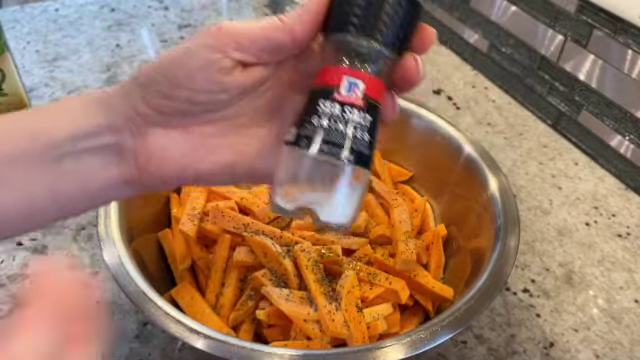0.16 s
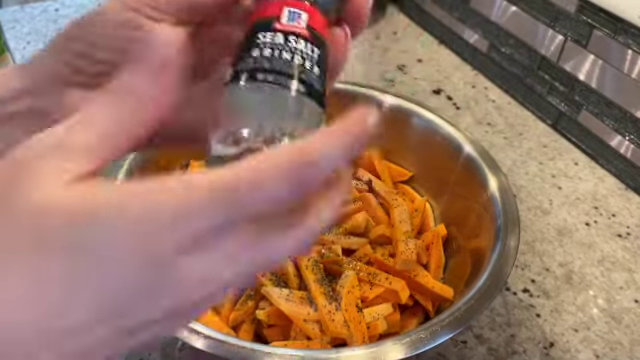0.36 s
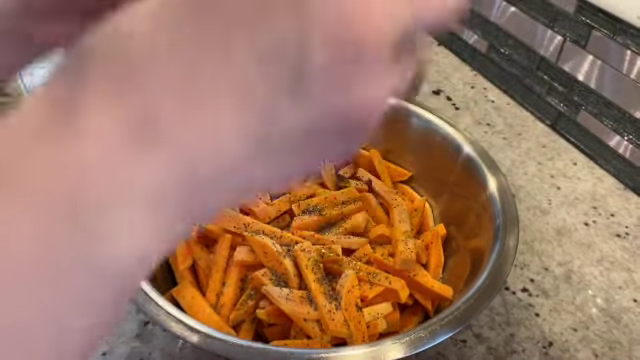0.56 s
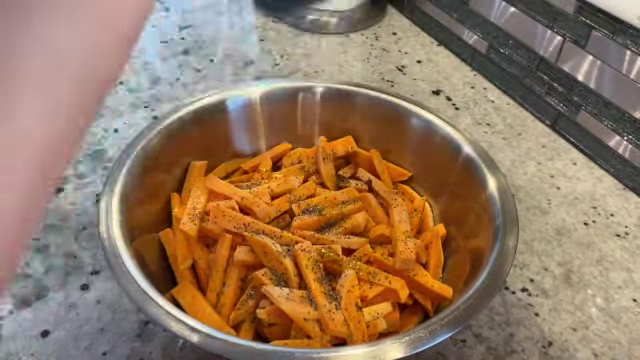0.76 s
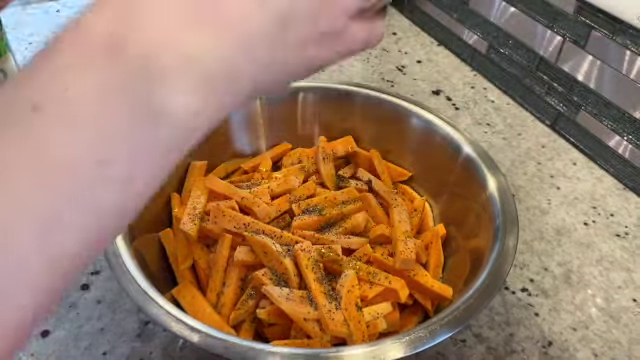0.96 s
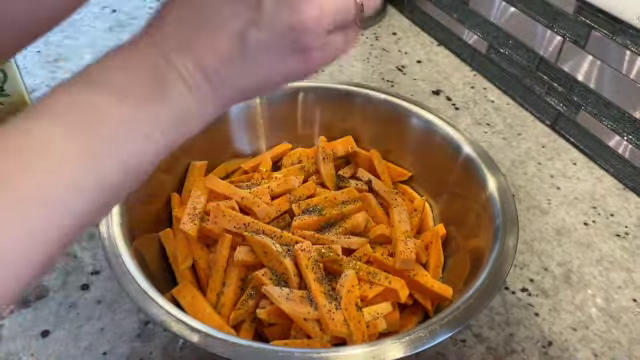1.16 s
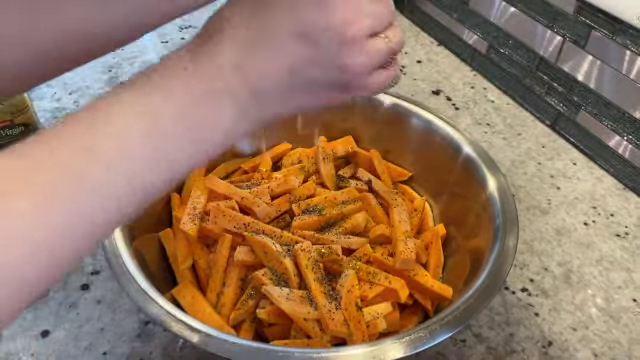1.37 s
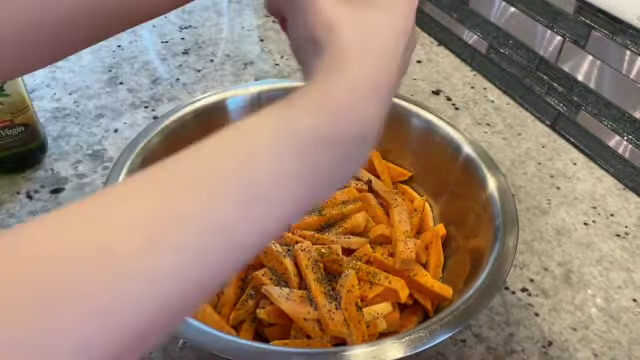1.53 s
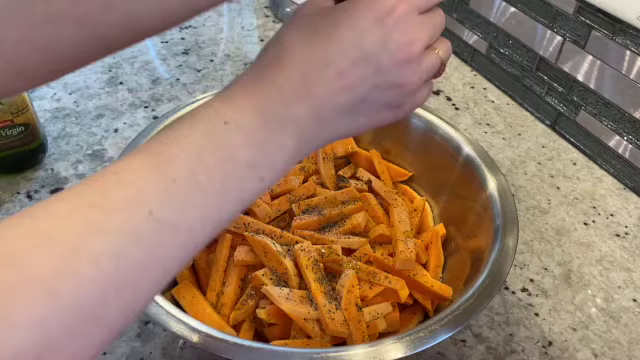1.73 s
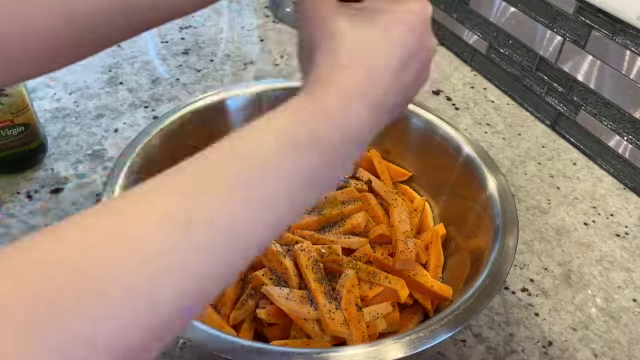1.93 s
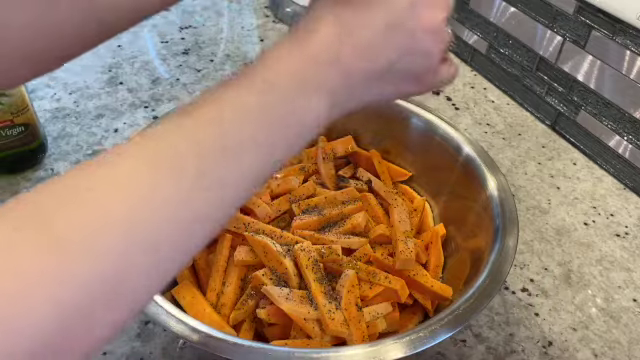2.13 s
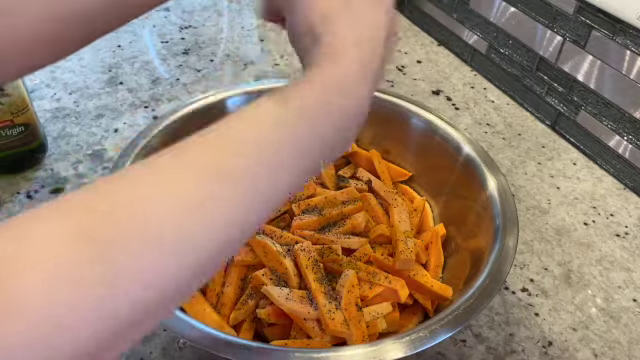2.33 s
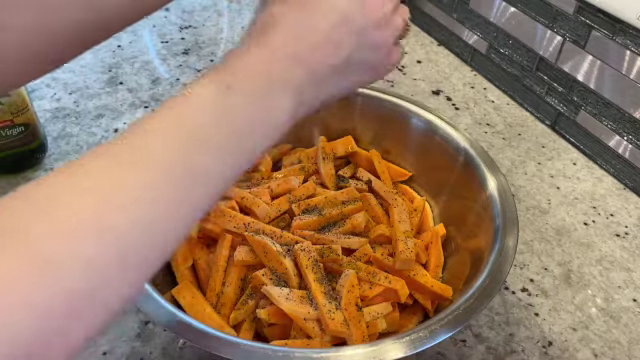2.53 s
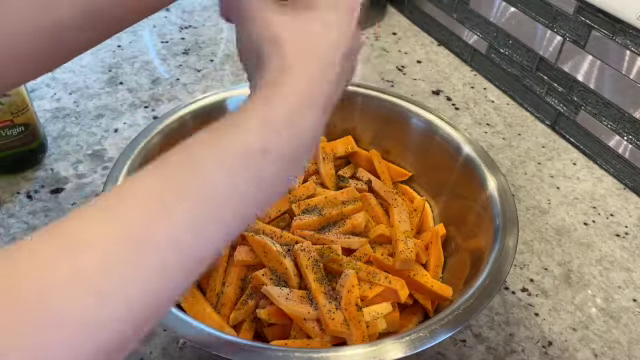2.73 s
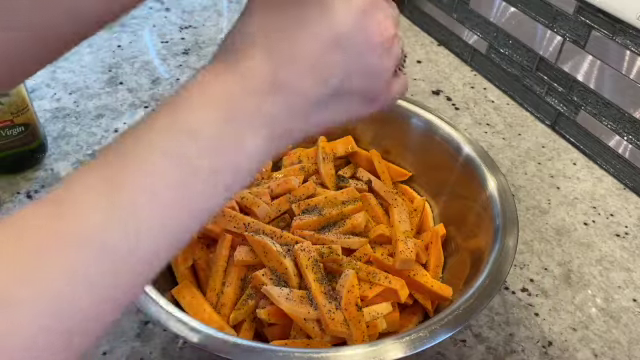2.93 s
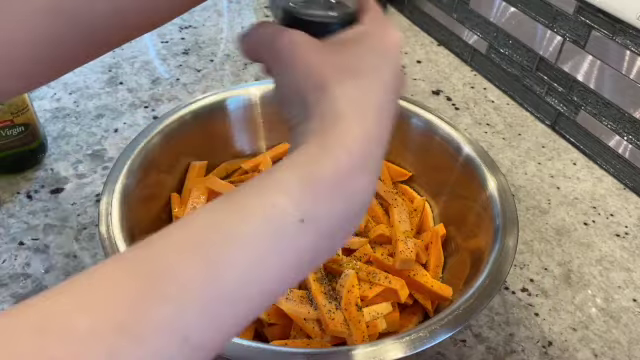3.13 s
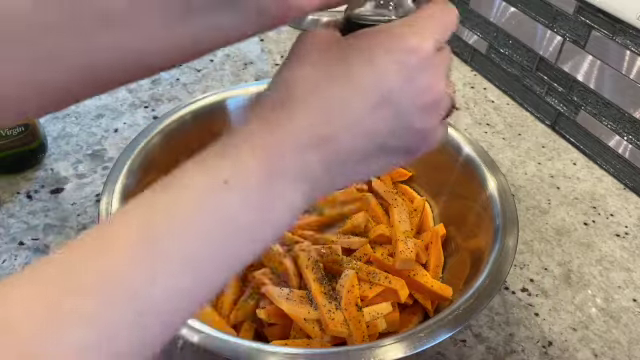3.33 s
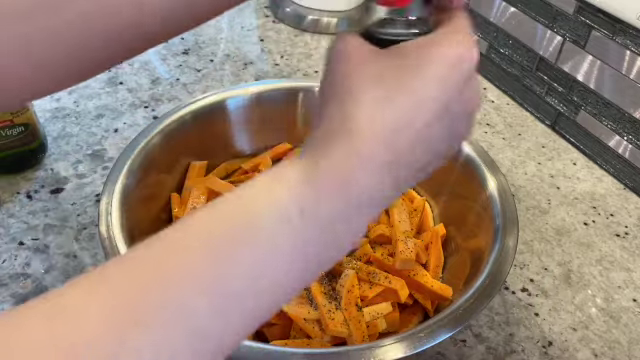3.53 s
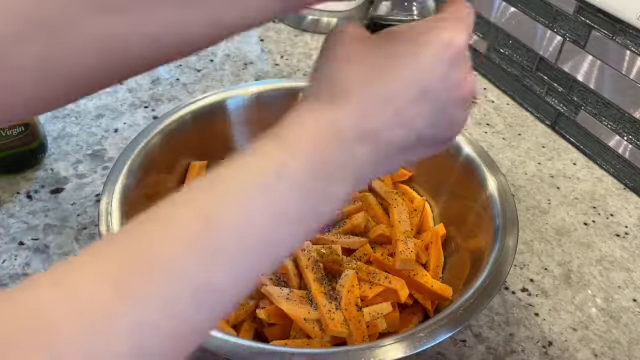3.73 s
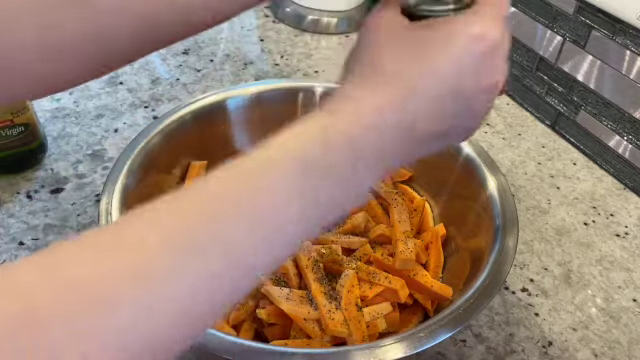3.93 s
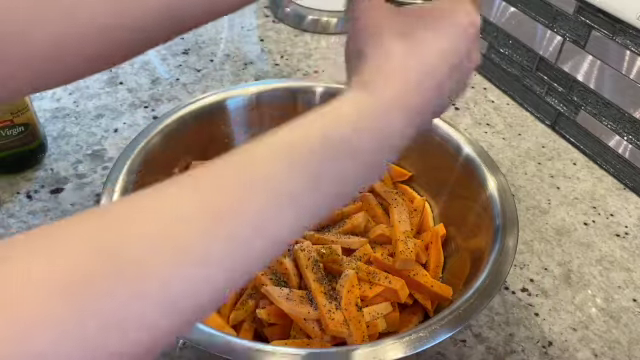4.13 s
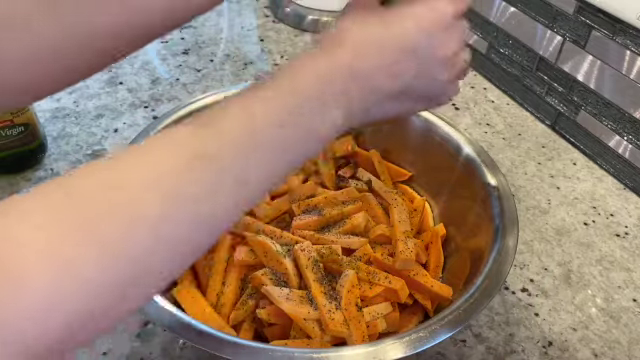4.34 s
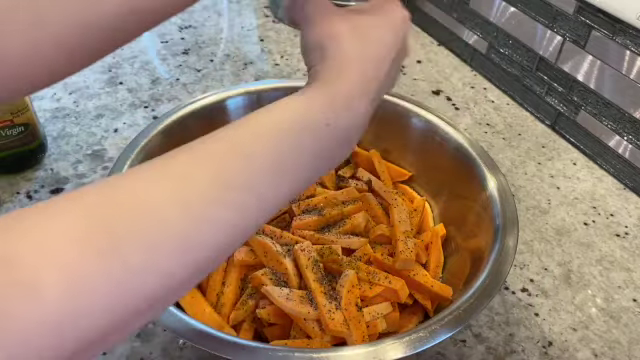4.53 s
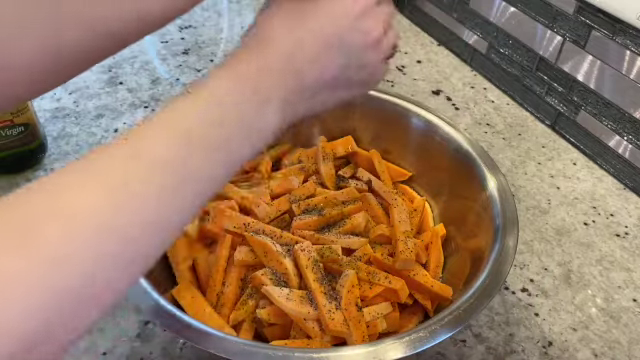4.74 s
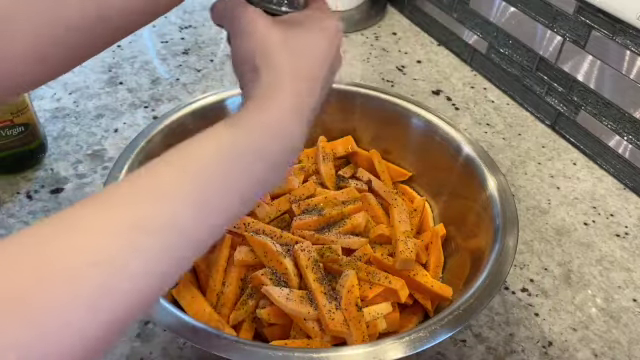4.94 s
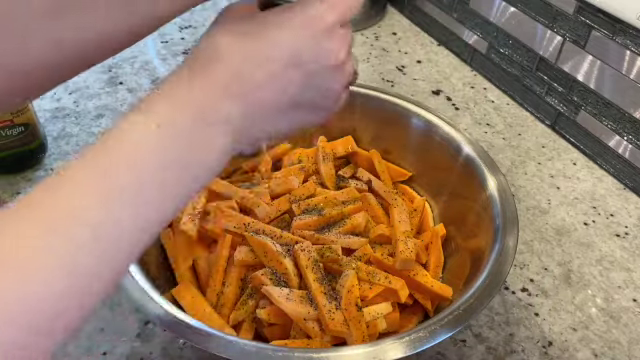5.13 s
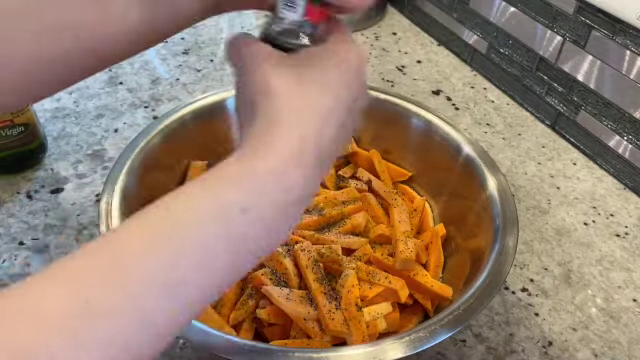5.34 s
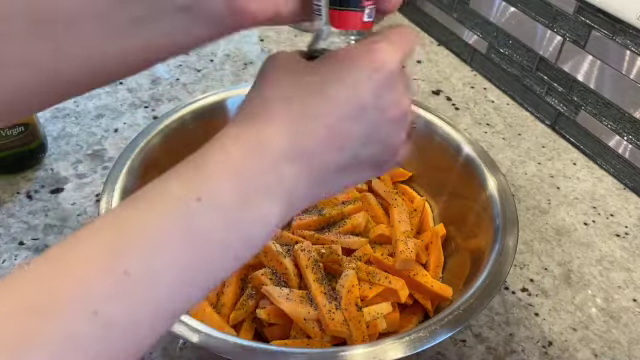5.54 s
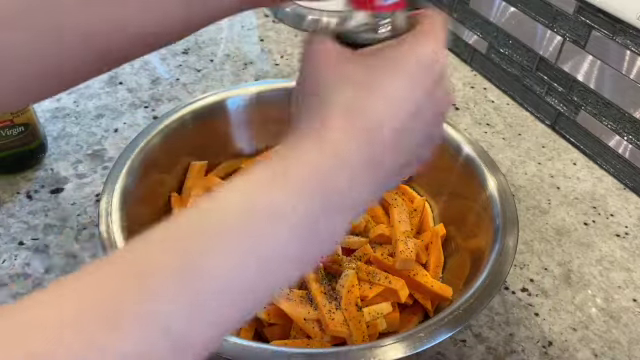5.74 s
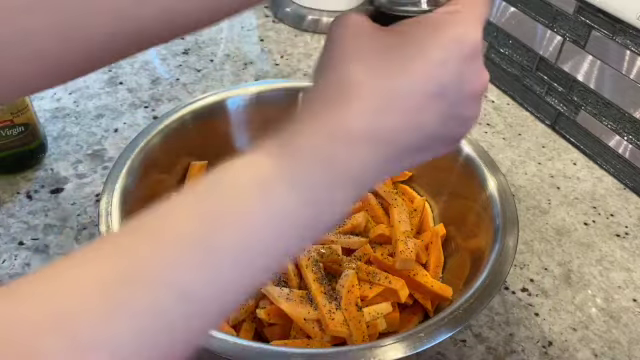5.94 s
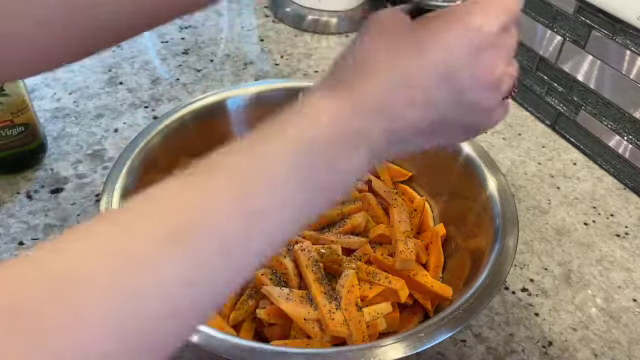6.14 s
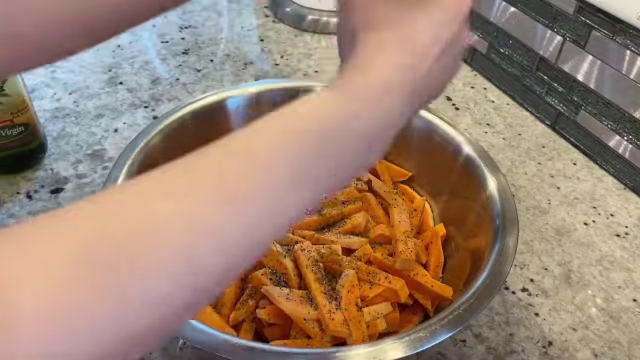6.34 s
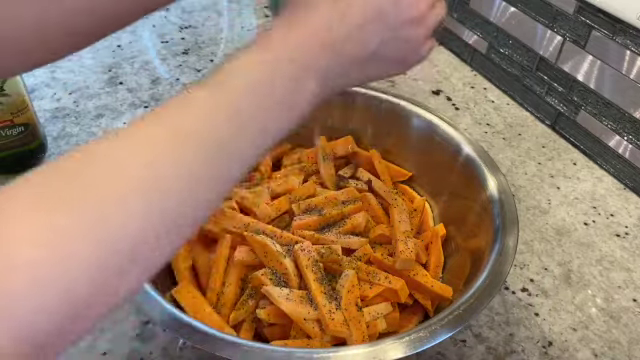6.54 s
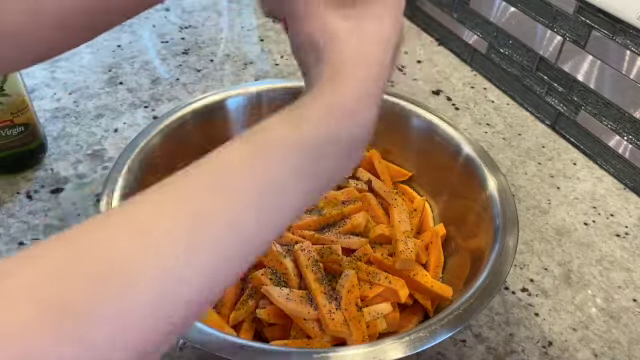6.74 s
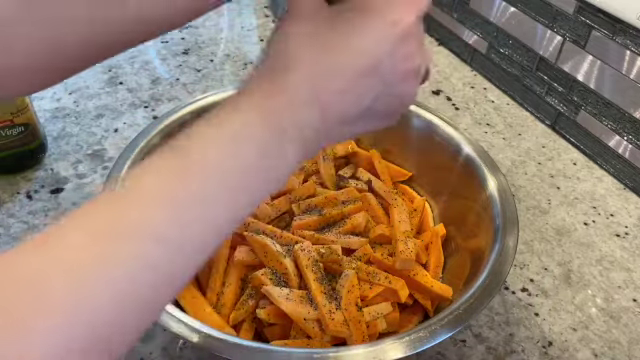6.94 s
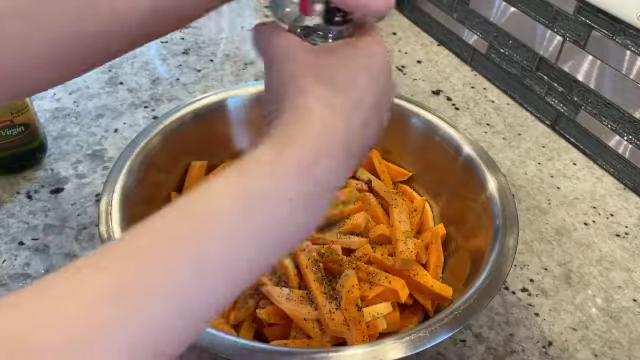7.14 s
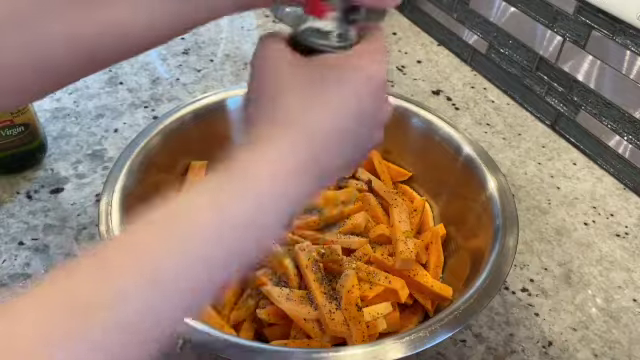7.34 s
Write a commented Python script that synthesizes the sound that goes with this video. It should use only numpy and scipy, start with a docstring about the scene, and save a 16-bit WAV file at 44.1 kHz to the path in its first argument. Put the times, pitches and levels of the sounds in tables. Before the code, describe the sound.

For the first second, a hand rubs faintly on a salt grinder, and at about 0.7 seconds the salt slides down the upturned jar with a brief, bright hiss. Grinding starts at 1.3 seconds with the longest, heaviest twist, full of loud cracking crystals. Seventeen twists in all run to the end at about 7.4 seconds, settling to roughly one every 0.35 seconds. Each is a sharp snap followed by a dry, gritty crunch about a tenth of a second long, ringing slightly in the plastic cap and jar. A soft hiss of ground salt spills after each stroke. The cap knocks once at about 4.4 seconds, and faint ticks come near 2.8 seconds and between 5.7 and 6.6 seconds. The sound is close, in stereo and slightly left, with a short kitchen reverberation over a faint low appliance hum and room rumble.

```python
"""A salt grinder, turned upside down, is twisted seventeen times over a steel bowl of cut vegetables.
In each twist crystals crack between the burrs and ring the plastic cap and the jar; ground salt spills
after it, and more trickles out as the hand swings back. The cap knocks once between two twists.
An appliance hums low in the kitchen; a close stereo microphone picks it all up."""
import sys
import numpy as np
from scipy import signal
from scipy.fft import rfft, irfft
from scipy.io import wavfile

SR = 44100
rng = np.random.default_rng(int(sys.argv[2]) if len(sys.argv) > 2 else 0)


def to_wav(s):
    """Save 16-bit WAV."""
    ch = np.atleast_2d(s).T  # columns
    pcm = np.round(np.clip(ch, -1, 1) * 32767)  # PCM
    wavfile.write(sys.argv[1], SR, pcm.astype(np.int16))


N = 325899
TIME = np.arange(N) / SR
HZ = np.fft.rfftfreq(N, 1 / SR)


def amp(db):
    """dB to gain."""
    return 10 ** (np.asarray(db) / 20)


def unit_rms(x):
    """Scale to rms 1."""
    return x / np.sqrt(np.mean(x ** 2) + 1e-20)


def log_interp(points, hz):
    """Interpolate (f/Hz, value) points over log frequency."""
    f, value = np.transpose(points)
    return np.interp(np.log(hz + 1), np.log(f + 1), value)


def add(mix, at_s, sound):
    """Mix a sound in place at at_s."""
    part = mix[..., max(round(at_s * SR), 0):][..., :sound.shape[-1]]
    part += sound[..., :part.shape[-1]]


def convolve(x, response):
    """Convolution cut to the length of x."""
    return signal.fftconvolve(np.atleast_2d(x), np.atleast_2d(response), axes=1)[:, :x.shape[-1]]


def min_phase(points, size=2048):
    """Minimum-phase impulse response of energy 1 from (f/Hz, level/dB) points."""
    log_gain = np.log(amp(log_interp(points, abs(np.fft.fftfreq(size, 1 / SR)))))
    spectrum = np.exp(np.conj(signal.hilbert(log_gain)))
    response = np.fft.ifft(spectrum).real[:size // 2]
    return response / np.linalg.norm(response)


def resonance(x, hz, q, db):
    """Peak filter, +db at hz."""
    return x + (amp(db) - 1) * signal.lfilter(*signal.iirpeak(hz, q, SR), x)


def stereo_noise(points, coherence):
    """Noise of rms 1 with a given spectrum and L/R coherence."""
    left, other = rfft(rng.standard_normal((2, N)))
    right = coherence * left + np.sqrt(1 - coherence ** 2) * other
    return unit_rms(irfft(np.array([left, right]) * amp(log_interp(points, HZ)), N))


def wander(rate_hz):
    """Low-passed random motion of rms 1."""
    return unit_rms(irfft(rfft(rng.standard_normal(N)) / (1 + (HZ / rate_hz) ** 4), N))


def swell_power(peak_s, rise_s, fall_s, db):
    """Power envelope: up 20 dB in rise_s, down 20 dB in fall_s."""
    return amp(db - 20 * np.maximum((peak_s - TIME) / rise_s, (TIME - peak_s) / fall_s)) ** 2


# rumble spectrum: f/Hz, level/dB
RUMBLE_SPECTRUM = [(20, -22), (40, -2.5), (65, 0), (110, 2.5), (190, -7), (290, -2.5), (480, -13),
                   (750, -19), (1500, -24.5), (3000, -31.5), (7000, -55), (15500, -84.5)]
# rumble L/R likeness: f/Hz, coherence
RUMBLE_COHERENCE = [(60, 1), (110, 0.96), (180, 0.92), (300, 0.79), (700, 0.14), (6000, 0.13)]
def room_rumble(level_db=-56):
    """Steady room noise, near mono in the bass."""
    return amp(level_db) * stereo_noise(RUMBLE_SPECTRUM, log_interp(RUMBLE_COHERENCE, HZ))


# hum envelope: t/s, level/dB
HUM_LEVEL = [(0, -56.5), (1.2, -55.5), (1.8, -61), (2.8, -56.5), (4.5, -49), (4.9, -59), (6.4, -53.5),
             (7.39, -57.5)]
def appliance_hum(hum_hz=68, drift_hz=2.65, waver_db=3):
    """Low tone wavering in pitch and level."""
    cycles = np.cumsum(hum_hz + drift_hz * wander(rate_hz=5.02)) / SR
    hum = unit_rms(np.sin(2 * np.pi * cycles) * amp(waver_db * wander(rate_hz=4)))
    return amp(np.interp(TIME, *np.transpose(HUM_LEVEL))) * hum


# reverb decay: f/Hz, t60/s
KITCHEN_T60 = [(200, 0.17), (1000, 0.5), (2500, 0.48), (5000, 0.39), (9000, 0.24), (15000, 0.12)]
def kitchen_reverb(x, build_s=0.0021):
    """Diffuse reflections off hard walls, each band with its own decay."""
    hz, t, bands = signal.stft(rng.standard_normal((2, SR)), SR, nperseg=256)
    decay = amp(-60 * t / log_interp(KITCHEN_T60, hz)[:, None])
    _, tail = signal.istft(bands * decay * (1 - np.exp(-t / build_s)), SR, nperseg=256)
    return convolve(x, tail / np.linalg.norm(tail[0]))


# rub spectrum: f/Hz, level/dB
RUB_SPECTRUM = [(200, -8.5), (700, -4), (2000, -3), (3500, -13.5), (8000, -23.5)]
def hand_rub():
    """Skin slides softly over the jar as the grip changes."""
    power = swell_power(peak_s=0.45, rise_s=0.3, fall_s=0.3, db=-64.5)
    return np.sqrt(power) * stereo_noise(RUB_SPECTRUM, coherence=0.63)


# salt shifting as the jar is turned over: peak t/s, rise and fall/s, level/dB
SALT_SHIFTS = [(.24, 0.093, -65), (.46, 0.087, -61.5), (.69, 0.14, -68.5), (1.005, 0.025, -54),
               (1.08, 0.11, -59.5), (1.21, 0.38, -61)]
# fine grain spectrum: f/Hz, level/dB
SALT_SPECTRUM = [(300, -4.5), (1300, -37.5), (2300, -2), (4300, -1), (6500, 3), (10000, 3.5), (15500, 1.5)]
def loose_salt(trickle_lag_s=0.15):
    """Salt shifts in the jar, spills as each twist lets go, then trickles on the back swing."""
    power = sum(swell_power(peak_s, width_s, width_s, db) for peak_s, width_s, db in SALT_SHIFTS)
    for start_s, length_s, *_, trickle_db in TWISTS:
        end_s = start_s + length_s
        spill = swell_power(end_s, rise_s=0.13, fall_s=0.18, db=-56)
        trickle = swell_power(end_s + trickle_lag_s, rise_s=0.29, fall_s=0.17, db=trickle_db)
        power += spill + trickle
    return np.sqrt(power) * stereo_noise(SALT_SPECTRUM, coherence=0.75)


# slide envelope: t/s, level/dB
SLIDE_LEVEL = [(.705, -70), (.722, -55), (.74, -33), (.775, -42.5), (.83, -59), (.92, -80)]
# slide spectrum: f/Hz, level/dB
SLIDE_SPECTRUM = [(500, -41), (1800, -20), (2800, -16.5), (3900, 1.5), (5500, -5.5), (7500, -4.5),
                  (11000, -1.5), (15500, -3)]
def salt_slide():
    """Salt runs down the upended jar and lands in the cap."""
    level_db = np.interp(TIME, *np.transpose(SLIDE_LEVEL), left=-np.inf, right=-np.inf)
    return amp(level_db) * stereo_noise(SLIDE_SPECTRUM, coherence=0.75)


# modes of the knocked cap: f/Hz, level/dB, t60/s
KNOCK_MODES = [(306, -45, 0.078), (934, -48, 0.092), (1176, -44, 0.072), (1770, -38, 0.047),
               (1940, -34, 0.023), (2700, -34, 0.0053), (3030, -22, 0.0045), (3530, -23, 0.0086),
               (4280, -20.5, 0.0058), (7250, -19, 0.0039), (8350, -12.5, 0.022), (7800, -41, 0.042),
               (10100, -26, 0.0044)]
def cap_knock(at_s=4.3574, attack_s=0.00022, click_db=-8, rattle_db=-14, rattle_t60_s=0.11,
              bounce_s=0.0084, bounce_db=-13):
    """The cap hits the jar and bounces once as the hand takes a new grip."""
    t = np.arange(6000) / SR
    ring = sum(amp(db - 60 * t / t60) * np.sin(2 * np.pi * hz * t) for hz, db, t60 in KNOCK_MODES)
    click = min_phase([(100, -11), (1000, 1), (4000, 7.5), (5500, -1), (11000, -2), (15000, -15)])
    rattle = rng.standard_normal((2, len(t))) * amp(-60 * t / rattle_t60_s)
    out = np.zeros((2, N))
    add(out, at_s, ring * (1 - np.exp(-t / attack_s)))
    add(out, at_s, amp(click_db) * click)
    add(out, at_s, amp(rattle_db) * convolve(rattle / np.linalg.norm(rattle[0]), click))
    add(out, at_s + bounce_s, amp(click_db + bounce_db) * click)
    return out


# cap and jar modes: f/Hz, level/dB, t60/s
BODY_MODES = [(246, -32.5, 0.058), (610, -12, 0.026), (1046, -13.5, 0.042), (1700, -17, 0.075),
              (2250, -15, 0.069), (2366, -20.5, 0.056), (3007, -20, 0.1), (3503, -23, 0.26),
              (4250, -17, 0.13), (4365, -23, .04), (5000, -20, .025), (7000, -53.5, .02)]
# breaking crystal spectrum: f/Hz, level/dB
CRACK_SPECTRUM = [(60, -27), (160, -6.5), (350, -8.5), (480, -11.5), (600, -13.5), (760, -16), (1350, -10),
                  (2100, 0), (3200, -0.5), (4700, 5), (6000, 1), (7200, 5), (10000, 1.5), (15500, -3)]
def crack(scatter_db=4, scatter_t60_s=0.034, build_s=0.00029, coherence=0.39):
    """One crack: an impulse, dense scatter off cap, bowl and counter, and the body modes."""
    t = np.arange(4096) / SR
    common, left, right = rng.standard_normal((3, len(t)))
    scatter = np.sqrt(coherence) * common + np.sqrt(1 - coherence) * np.array([left, right])
    scatter *= amp(-60 * t / scatter_t60_s) * (1 - np.exp(-t / build_s))
    response = amp(scatter_db) * scatter / np.linalg.norm(scatter[0])
    response[:, 0] += 1  # direct impulse
    for hz, db, t60 in BODY_MODES:
        ring = np.sin(2 * np.pi * (hz * t + rng.random())) * amp(-60 * t / t60)
        response += amp(db) * ring / np.linalg.norm(ring)
    response = convolve(response, min_phase(CRACK_SPECTRUM))
    return response / np.sqrt(np.sum(response ** 2) / 2)


# faint ticks and soft knocks: t/s, level/dB
FAINT_TICKS = [(2.838, -26.5), (2.894, -31), (5.724, -24.5), (6.061, -28), (6.21, -38), (6.244, -32.5),
               (6.588, -29)]
def faint_ticks():
    """Faint ticks and soft knocks between the twists."""
    out = np.zeros((2, N))
    for at_s, db in FAINT_TICKS:
        add(out, at_s, amp(db) * crack())
    return out


def crystal_burst(step_s=0.0006, step_db=-5, steps=3):
    """A crystal splits in quick steps, each weaker than the last."""
    out = np.zeros((2, SR // 10))
    for k, jitter in enumerate(rng.uniform(0, 0.5, steps)):
        add(out, k * (1 + jitter) * step_s, amp(k * step_db) * crack())
    return out / np.sqrt(np.sum(out ** 2) / 2)


# large crystal bursts: t/s, level/dB
BURSTS = [(1.318, -7.5), (1.357, 1), (1.4188, 6.5), (1.435, 1), (1.439, 7), (1.447, 3.5), (1.843, 0),
          (1.876, 2.5), (1.951, -8), (2.225, -5), (2.3, -5), (2.695, -2), (2.744, -12), (3.037, 2.5),
          (3.081, -3.5), (3.39, -15), (3.744, -2), (3.765, -3.5), (3.801, -8.5), (4.062, -6), (4.091, -1.5),
          (4.421, -4), (4.461, -2), (4.473, 0.5), (4.518, -2.5), (4.56, -15), (4.912, -9.5), (5.234, 5.5),
          (5.274, -4), (5.585, -2.5), (5.922, -3), (6.349, 1.5), (6.692, -0.5), (7.027, 1.5), (7.038, -5),
          (7.37, -4.5)]
def large_crystals():
    """The largest crystals burst between the burrs."""
    out = np.zeros((2, N))
    for at_s, db in BURSTS:
        add(out, at_s, amp(db) * crystal_burst())
    return out


def twist_force(t, length_s, bite_s=0.021, rise_db_per_s=2600, fall_db_per_s=520):
    """Force on the burrs: quick bite, shallow arch, fall on release."""
    bite_db = -10.5 * (1 - np.clip(t / bite_s, 0, 1))
    arch_db = -3.5 * (2 * np.clip(t / length_s, 0, 1) - 1) ** 2
    edges_db = rise_db_per_s * np.minimum(t, 0) - fall_db_per_s * np.maximum(t - length_s, 0)
    return amp(bite_db + arch_db + edges_db)


def twist_tone(start_s, colour_db, heavy_fade_s=0.3):
    """Tone filter of one twist; the first twists sound heavier in the bass, hollower in the middle."""
    heavy = np.exp(-(start_s - TWISTS[0][0]) / heavy_fade_s)
    bass_db = colour_db / 2 + 5 * heavy
    mid_db = colour_db / 2 - 6 * heavy
    treble_db = 0.42 * colour_db - 1.5
    return min_phase([(240, bass_db), (450, mid_db), (1000, mid_db), (2000, colour_db),
                      (3500, 0.0087), (5200, 0.0065), (8000, treble_db)])


def burr_crunch(t, force, cracks_per_s=1700, spread_db=2, powder_db=-8, medium_per_s=25, medium_db=17,
                slips_per_s=120, slip_decay_s=0.0019, slip_depth=0.59, teeth=5):
    """The burrs crush fine and medium crystals in uneven slips over a rasp of powder."""
    n = len(t)
    powder = rng.standard_normal(n)
    size_db = spread_db * np.minimum(rng.exponential(1, n), 3.6)
    fine = unit_rms((rng.random(n) < cracks_per_s / SR) * np.sign(powder) * amp(size_db))
    medium = (rng.random(n) < medium_per_s / SR) * amp(medium_db)
    # pressure gives way in slips, each a short surge of cracks
    slip_times = t[0] + np.append(0, np.cumsum(rng.gamma(2, 0.5, size=200)) / slips_per_s)
    slip = np.searchsorted(slip_times, t, "right") - 1
    surges = unit_rms(1 - slip_depth + slip_depth * np.exp(-(t - slip_times[slip]) / slip_decay_s))
    drive = force * (surges * (fine + amp(powder_db) * powder) + medium)
    # teeth take the load in turn, two slips each; each has its own ring
    loaded_tooth = slip // 2 % teeth
    tooth_hz = 2000 * 2 ** rng.uniform(0, 1.99, teeth)
    return sum(convolve(drive * (loaded_tooth == k), resonance(crack(), hz, q=10, db=5))
               for k, hz in enumerate(tooth_hz))


# twists of the hand: t/s, length/s, level/dB, low-mid colour/dB, ring f/Hz, trickle level/dB
TWISTS = [(1.329, 0.19, -23, 2, 3010, -51), (1.839, 0.11, -26, 9.5, 3980, -74.5),
          (2.216, .11, -26, 10, 1730, -51.5), (2.619, 0.11, -26.5, 3, 1700, -71),
          (2.975, 0.099, -28.5, 5.5, 4000, -50.5), (3.348, 0.08, -25, 3.5, 6760, -74),
          (3.704, 0.082, -27.5, 3.5, 6550, -54), (4.062, 0.072, -26.5, -1, 6850, -72),
          (4.42, 0.1, -29.5, 3, 7000, -55.5), (4.8, 0.09, -28, 0, 2500, -54.5),
          (5.188, 0.086, -29.5, 5, 4400, -71), (5.546, 0.08, -27.5, 5, 5750, -52.5),
          (5.892, 0.088, -26, 2.5, 6040, -79), (6.255, 0.09, -27.5, 3.5, 5200, -55.5),
          (6.601, 0.089, -28, 2.5, 5460, -52), (6.95, 0.088, -26.5, .5, 5600, -52.5),
          (7.307, 0.064, -25, 1, 6760, -63)]
def grinder_twists(crunch_db=-3, snap_db=18, snap_lag_s=0.012):
    """Each twist opens with a snap and crunches on; grip and wedged crystals favour one ring."""
    out = np.zeros((2, N))
    for start_s, length_s, level_db, colour_db, ring_hz, _ in TWISTS:
        t = np.arange(-0.02, length_s + 0.15, 1 / SR)
        crunch = burr_crunch(t, twist_force(t, length_s))
        crunch = resonance(crunch, ring_hz, q=7.2, db=4.5)
        crunch = convolve(crunch, twist_tone(start_s, colour_db))
        add(out, start_s + t[0], amp(level_db + crunch_db) * crunch)
        add(out, start_s + snap_lag_s, amp(level_db + snap_db) * crystal_burst())
    return out


# stereo balance: f/Hz, left minus right/dB
BALANCE = [(300, -1), (480, -1.5), (640, -4.5), (1000, 2.5), (1700, 0), (2200, 3), (3300, 1.5), (4400, 3),
           (5500, 3), (6500, 0.5)]
def scene(reverb_db=-14, knock_reverb_db=-15, grain_db=1.4, patch_db=0.75):
    """Grinder and salt slightly left in the kitchen, over hum and rumble."""
    grinding = grinder_twists() + large_crystals() + faint_ticks()
    graininess = unit_rms(amp(grain_db * wander(rate_hz=500) + patch_db * wander(rate_hz=45)))
    near = grinding + graininess * (loose_salt() + salt_slide()) + hand_rub()
    knock = cap_knock()
    reverb = kitchen_reverb(amp(reverb_db) * near + amp(knock_reverb_db) * knock)
    mix = (near + knock + reverb) * signal.windows.tukey(N, 0.001)
    lean_db = log_interp(BALANCE, HZ) / 2
    panned = irfft(rfft(mix) * amp([lean_db, -lean_db]), N)
    return panned + appliance_hum() + room_rumble()


def record(dry, in_phase_hz=7000, period_hz=4200, dwell_rad=0.12, cutoff_hz=15900):
    """Stereo microphone: pickup alternates in-phase and anti-phase across the treble; then a low-pass."""
    left, right = rfft(dry)
    angle = np.pi * (HZ - in_phase_hz) / period_hz
    angle -= dwell_rad * np.sin(4 * angle)  # lingers at each extreme
    mid, side = np.cos(angle) * left, -1j * np.sin(angle) * right
    treble = np.interp(HZ, [5600, 6600], [0, 1])
    spectrum = (1 - treble) * np.array([left, right]) + treble * np.array([mid + side, mid - side])
    lowpass = signal.firwin(511, cutoff_hz, window=("kaiser", 9), fs=SR)
    return signal.oaconvolve(irfft(spectrum, N), lowpass[None], "same")


dry = scene()
out = record(dry)
to_wav(out)
```